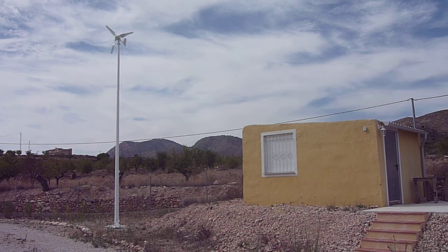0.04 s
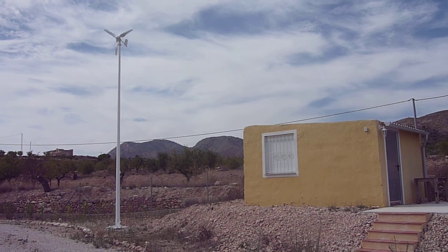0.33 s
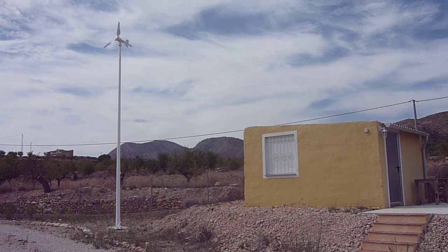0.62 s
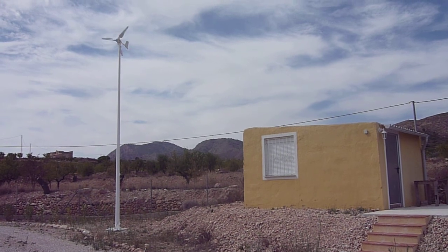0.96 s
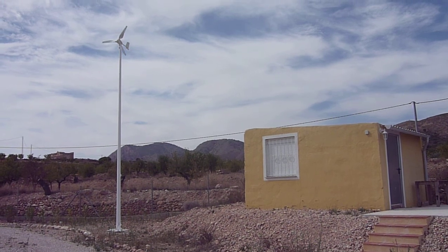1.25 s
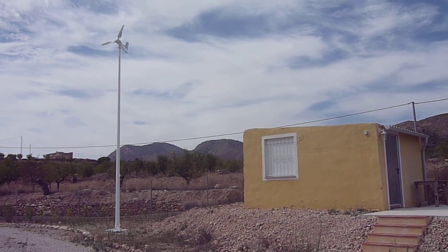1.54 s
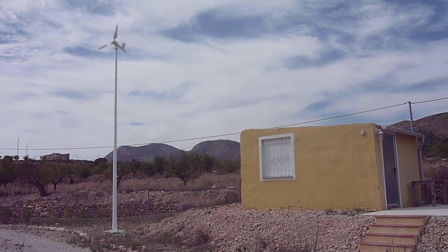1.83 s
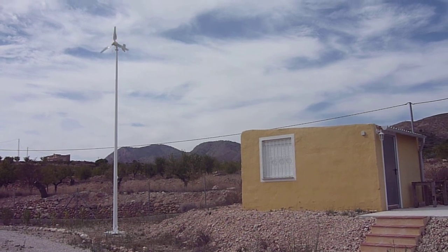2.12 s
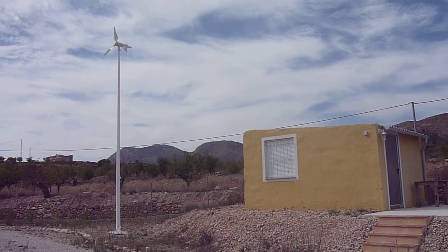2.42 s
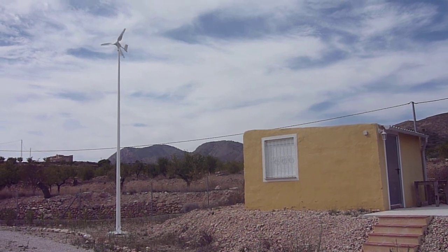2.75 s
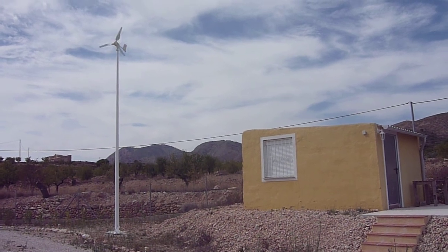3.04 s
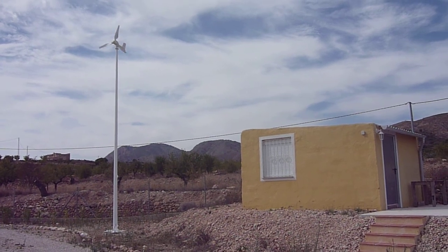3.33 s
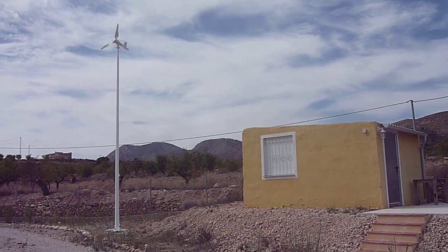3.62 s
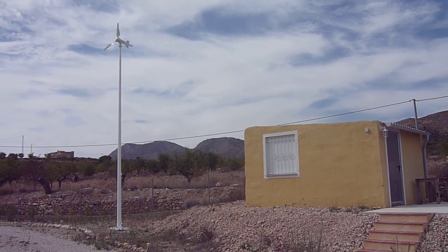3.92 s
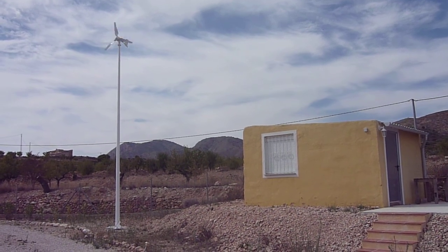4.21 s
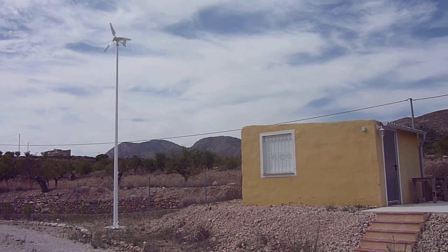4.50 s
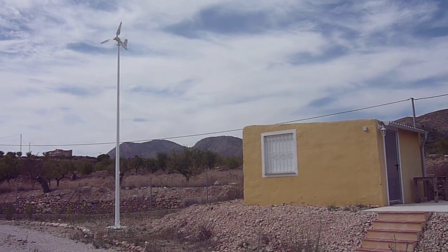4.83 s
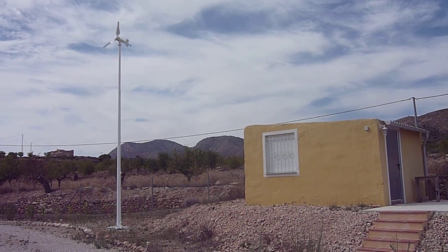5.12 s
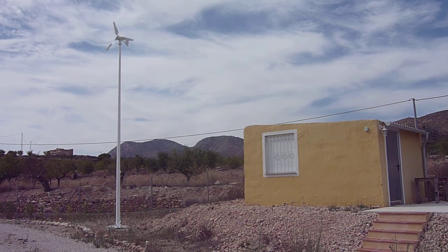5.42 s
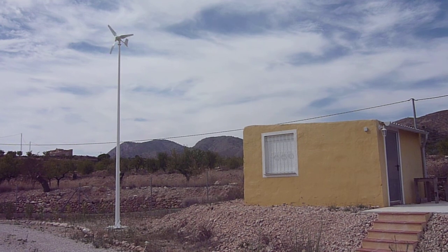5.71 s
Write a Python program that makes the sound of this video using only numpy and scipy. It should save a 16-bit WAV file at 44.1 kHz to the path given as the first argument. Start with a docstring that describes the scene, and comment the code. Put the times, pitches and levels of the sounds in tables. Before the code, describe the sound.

Wind buffets the microphone in dull, low thumps over the soft, steady airy rush of a small wind turbine.

```python
"""Small wind turbine in gusty open country

Three blades spin on a steel mast, tearing the air into a rush that swells with the wind. The mast
drones; one surge of the rotor brings a rising swish and a faint generator hum. A thin whistle comes
and goes. Gusts tumble over the microphone in dull thumps, and something ticks once on the recorder."""
import sys
import numpy as np
from scipy import signal
from scipy.fft import rfft, irfft
from scipy.io import wavfile

SR = 44100
rng = np.random.default_rng(int(sys.argv[2]) if len(sys.argv) > 2 else 0)


def inscribe(sig):
    """Save sig as 16-bit PCM at rate SR to the path in sys.argv[1].

    A 1-D sig is mono; a 2-D sig holds one channel per row.
    Samples are clipped to [-1, 1] before scaling.
    """
    pcm = np.round(np.clip(np.atleast_2d(sig).T, -1, 1) * 32767)
    wavfile.write(sys.argv[1], SR, pcm.astype(np.int16))


N = 254016
TIME = np.arange(N) / SR
BINS_HZ = np.maximum(np.arange(N // 2 + 1) * SR / N, 1)

# The rotor's swell with the wind, before each layer's trim: time_s, rush_db, edge_hiss_db
ROTOR_SWELL = [(0, -59, -68), (.65, -59, -67), (1.5, -54.5, -62), (2.55, -53.5, -63), (3.4, -54, -62),
               (5.76, -54, -59.5)]
SURGE_START_S, SURGE_HOLD_S, SURGE_ATTACK_S, SURGE_RELEASE_S = 2.36, .36, .24, .24


def blades(rush_trim_db=1.5, edge_trim_db=-8.0, pass_hz=27.6, throb_db=.5, patchy_db=.48):
    """Air torn at the blade edges; the rush throbs lightly as each blade passes."""
    # Body of the rush: frequency_hz, level_db
    rush_spectrum = [(190, -33.5), (330, 0.5), (420, 0), (453, 1), (576, -1.5), (664, -1), (932, -5),
                     (1090, -2.5), (1320, -6.5), (1780, -9.5), (2030, -10.5), (2190, -11.5), (3210, -14),
                     (4500, -31), (5850, -54.5), (9900, -120)]
    # Hiss of the blade edges: frequency_hz, level_db
    edge_spectrum = [(900, -28), (2200, -2.5), (3300, 0), (3800, -4.5), (4500, -24.5), (7000, -53)]
    rush_db, edge_db = in_time(ROTOR_SWELL)
    rush = from_db(rush_db + rush_trim_db + patchy_db * drift(26)) * coloured(rush_spectrum)
    edge = from_db(edge_db + edge_trim_db) * coloured(edge_spectrum)
    pass_phase = phase_of(pass_hz * (1 + .099 * drift(1.6)))
    return (rush + edge + swish()) * from_db(throb_db * np.sin(pass_phase))


def swish(pitch_hz=690.7, rise_hz_per_s=260, level_db=-55.5):
    """Vortices shed by the blades sing in breathy bands that rise with the rotor's speed."""
    # Vortex bands: pitch_ratio, width_hz, level_db
    vortex_bands = [(1, 296, -2), (1.221, 161, -10.5), (2.1, 340, -7), (2.35, 259, -9), (2.95, 140, -13.5)]
    glide_s = np.clip(TIME - SURGE_START_S, -SURGE_ATTACK_S, SURGE_HOLD_S + SURGE_RELEASE_S)
    phase = phase_of(pitch_hz + rise_hz_per_s * glide_s)
    breath = np.zeros(N)
    for ratio, width_hz, db in vortex_bands:
        band = drift(width_hz / 2) * np.cos(ratio * phase) + drift(width_hz / 2) * np.sin(ratio * phase)
        breath += from_db(db) * band
    return from_db(level_db) * surge() * breath


def surge():
    """The rotor surges once as it swings across the wind, driving swish, hum and drone: 0 to 1."""
    return envelope(SURGE_START_S, SURGE_HOLD_S, SURGE_ATTACK_S, SURGE_RELEASE_S)


def mast(over_rush_db=.06, surge_lift_db=2.5, flutter_db=2.5):
    """The shaking turbine head sets the steel tube droning; the generator hums through it in the surge."""
    # Resonances of the tube: pitch_hz, width_hz, level_db
    tube_modes = [(172, 230, -8), (229.8, 67, -1), (284.2, 32, 0), (403, 19, -14.5)]
    rush_db, _ = in_time(ROTOR_SWELL)
    drone_db = rush_db + over_rush_db + surge_lift_db * surge()
    drone = from_db(drone_db + flutter_db * drift(25)) * resonant(tube_modes)
    hum = surge() * tone(hz=98.9, db=-64.5, waver=.017, flutter_db=4.0)
    return drone + hum


def gusts(attack_s=.011, release_s=.018, breeze_db=-61):
    """Strength of the wind at the microphone: gusts on top of a light breeze."""
    # Gust cues: start_s, hold_s, level_db
    cues = [(0.013, 0.17, -32), (0.216, .15, -36.5), (0.431, 0.038, -32.5), (.52, .065, -33),
            (0.826, 0.014, -43.5), (0.966, 0.047, -41), (1.111, .11, -36), (1.335, 0.038, -42),
            (1.548, 0.18, -44), (1.841, 0.084, -37), (2.975, .12, -39), (3.178, 0.025, -46),
            (3.942, .27, -51), (4.292, 0.075, -40), (4.445, .43, -49), (4.723, .07, -36.5),
            (5.496, 0.059, -45), (5.604, 0.023, -29), (5.749, 0.0093, -38)]
    power = sum((from_db(db) * envelope(s, hold, attack_s, release_s)) ** 2 for s, hold, db in cues)
    return np.sqrt(power + from_db(breeze_db) ** 2)


def turbulence(trim_db=-1.0, lumpy_db=2.0, window_s=.03, bright_above_hz=230, full_gust_db=-32):
    """Wind buffets the microphone: a lumpy low rumble, louder and brighter in the stronger gusts."""
    # Colour of the buffeting: frequency_hz, level_db
    buffet_spectrum = [(20, -20.5), (35, -2), (70, 2.5), (140, -2.5), (240, -10), (330, -16.5),
                       (480, -29.5), (900, -53), (2000, -79.5)]
    rumble = coloured(buffet_spectrum)
    window = signal.windows.hann(int(window_s * SR))
    local_power = signal.fftconvolve(rumble ** 2, window, "same")
    rumble = rms_one(rumble / np.sqrt(local_power))   # steady before the gusts shape it
    low = signal.sosfiltfilt(signal.butter(2, bright_above_hz, fs=SR, output="sos"), rumble)
    strength = gusts()
    brightness = (strength / from_db(full_gust_db)) ** .3
    return strength * from_db(trim_db + lumpy_db * drift(20)) * (low + brightness * (rumble - low))


def eddies(trim_db=-.5, lopsided=.24, usual_db=-20, hard_db=-11.5, core_db=-23.0, core_s=.0008):
    """Each eddy is a suction dip between two pressure swings; hard ones are shorter, with a sharp core."""
    # Strong pressure dips of wind on the microphone; dips a few milliseconds apart sound as one thump:
    # centre_s, peak_db, pitch_hz
    strong_dips = [(.041, -11.5, 116), (.0575, -18.5, 195), (.1019, -21, 168), (.1426, -21, 144),
                   (.162, -10, 130), (.227, -14.5, 190), (.2346, -13, 172), (.2863, -23.5, 128),
                   (.3018, -18, 174), (.326, -19, 181), (.3415, -11.5, 212), (.3496, -14.5, 290),
                   (.42, -21, 111), (.4487, -15.5, 170), (.5373, -23, 109), (1.1202, -17.5, 174),
                   (1.142, -21, 111), (1.2068, -25.5, 128), (1.3605, -22, 135), (1.6388, -22, 114),
                   (1.747, -28, 136), (2.9828, -29.5, 158), (3.029, -26, 105), (3.1945, -31.5, 80),
                   (4.2905, -16, 249), (4.2996, -17, 262), (4.3499, -24, 99), (4.5226, -29, 116),
                   (4.7332, -23, 107), (5.6115, -23, 152), (5.6198, -15, 205), (5.6363, -19.5, 142)]
    thumps = np.zeros(N)
    swirl_clock = TIME + .14 * np.cumsum(drift(110)) / SR   # the swirl runs unevenly
    rows = list(strong_dips) + small_eddies()
    for (centre_s, db, hz), skew in zip(rows, rng.standard_normal(len(rows))):
        centre = min(int(centre_s * SR), N - 1)
        near = slice(max(centre - SR // 20, 0), centre + SR // 20)
        since_s = TIME[near] - centre_s
        half_width_cycles = min(.35 * np.exp(.02 * (usual_db - db)), .5)
        swing = -np.cos(2 * np.pi * hz * (swirl_clock[near] - swirl_clock[centre]) + lopsided * skew)
        thumps[near] += from_db(db + trim_db) * swing / np.cosh(since_s * hz / half_width_cycles)
        core_depth = from_db(core_db + 3.7 * min(db - hard_db, 0))   # falls away fast in softer eddies
        thumps[near] -= core_depth * np.exp(-np.abs(since_s) / core_s)   # the cusp crackles
    return thumps


def small_eddies(per_s=45, over_gust_db=4.5, spread_db=2, pitch_hz=129.3, spread_octaves=.38):
    """Small eddies arrive at random, scaled by the gust that carries them: centre_s, peak_db, pitch_hz."""
    arrivals = np.flatnonzero(rng.random(N) < per_s / SR)
    size, detune = np.clip(rng.standard_normal((len(arrivals), 2)), -2, 2).T
    peak_db = 20 * np.log10(gusts()[arrivals]) + over_gust_db + spread_db * size
    return list(zip(arrivals / SR, peak_db, pitch_hz * 2 ** (spread_octaves * detune)))


def tick(start_s=4.9405, touch_db=-25.5, soften_hz=2700):
    """A light touch rings the recorder's case for a few milliseconds."""
    # Modes of the case: pitch_hz, level_db, t60_s
    case_modes = [(334, -5, .011), (670, -4.5, 0.0085), (1280, -5, 0.0041), (1610, -2, 0.013),
                  (2920, -6.5, .004)]
    touch = np.zeros(N)
    touch[int(start_s * SR)] = from_db(touch_db)
    ringing = sum(from_db(db) * ring(touch, hz, t60) for hz, db, t60 in case_modes)
    return signal.sosfilt(signal.butter(4, soften_hz, fs=SR, output="sos"), ringing)


def whistle():
    """A thin whistle fades in and out once."""
    fade = envelope(start_s=.88, hold_s=.3, attack_s=.09, release_s=.09)
    return fade * tone(hz=805, db=-64.5, waver=.012, flutter_db=1.0)


def hiss(level_db=-68):
    """The microphone's own faint, steady hiss."""
    # Colour of the hiss: frequency_hz, level_db
    hiss_spectrum = [(30, 0.5), (100, 0.5), (400, 1.5), (3000, -2), (5000, -0.5), (7300, -0.5), (8100, -7),
                     (8700, -21.5)]
    return from_db(level_db) * coloured(hiss_spectrum)


def from_db(db):
    """Decibels to gain."""
    return 10 ** (np.asarray(db) / 20)


def rms_one(x):
    """Scale to unit power."""
    return x / np.sqrt(np.mean(x ** 2) + 1e-20)


def in_time(rows):
    """Each column of a curve, at every sample."""
    time_s, *columns = np.transpose(rows)
    return [np.interp(TIME, time_s, column) for column in columns]


def envelope(start_s, hold_s, attack_s, release_s):
    """Swells exponentially up to the start, holds at 1, then dies away."""
    swell = np.minimum(TIME - start_s, 0) / attack_s
    decay = np.maximum(TIME - start_s - hold_s, 0) / release_s
    return np.exp(swell - decay)


def noise(gain):
    """Unit-power noise shaped by a gain at each frequency."""
    return rms_one(irfft(rfft(rng.standard_normal(N)) * gain, N))


def drift(rate_hz):
    """Random wander of spread 1, mostly slower than the rate."""
    return noise(1 / (1 + (BINS_HZ / rate_hz) ** 2))


def coloured(spectrum):
    """Noise that follows a spectrum of frequency_hz, level_db points."""
    hz, db = np.transpose(spectrum)
    return noise(from_db(np.interp(np.log(BINS_HZ), np.log(hz), db)))


def resonant(peaks):
    """Noise that rings in steep-sided resonances."""
    return noise(sum(from_db(db) / (1 + ((BINS_HZ - hz) / width * 2) ** 2) for hz, width, db in peaks))


def phase_of(hz):
    """Running phase of a moving pitch, in radians."""
    return 2 * np.pi * np.cumsum(hz) / SR


def tone(hz, db, waver, flutter_db):
    """A sine, unsteady in pitch and level."""
    phase = phase_of(hz * (1 + waver * drift(12)))
    return np.sqrt(2) * from_db(db + flutter_db * drift(6.5)) * np.sin(phase)


def ring(clicks, hz, t60_s):
    """Each click sets a decaying sine ringing."""
    decay = from_db(-60 / (t60_s * SR))
    step = 2 * np.pi * hz / SR
    return signal.lfilter([0, np.sin(step)], [1, -2 * decay * np.cos(step), decay ** 2], clicks + 1e-18)


def scene(bass_cut_hz=27.0):
    """The turbine some way off, wind and a tick right at the microphone, over a bed of hiss."""
    turbine = blades() + mast() + whistle()
    # the small capsule is deaf to the deepest swings
    bass_cut = signal.butter(3, bass_cut_hz, "high", fs=SR, output="sos")
    wind = signal.sosfiltfilt(bass_cut, turbulence() + eddies(), padtype="even")
    return (turbine + wind + tick() + hiss())[None]


def record(dry, ceiling=.272, treble_cut_hz=8600, dc_offset=-.0075):
    """The hardest thumps clip and crackle; the treble is cut; the converter sits slightly off zero."""
    clipped = np.clip(dry, -ceiling, ceiling)
    treble_cut = signal.ellip(8, .1, 45, treble_cut_hz, fs=SR, output="sos")
    return signal.sosfiltfilt(treble_cut, clipped) + dc_offset


dry = scene()
out = record(dry)
inscribe(out)
```